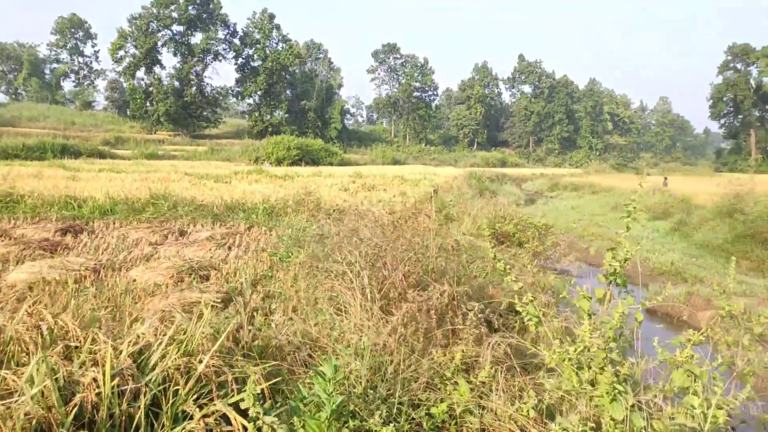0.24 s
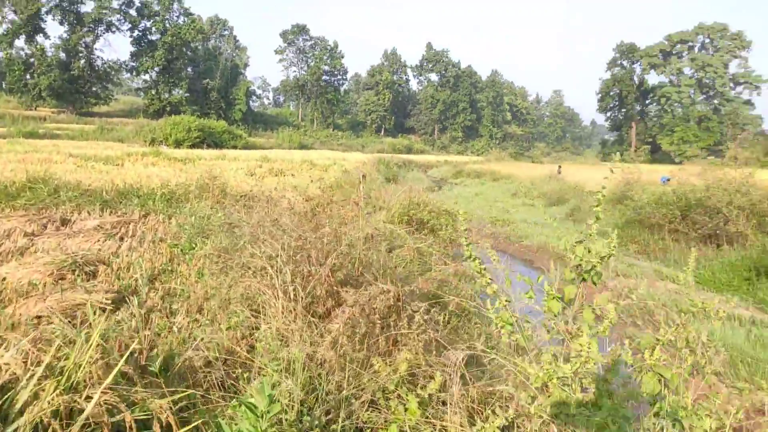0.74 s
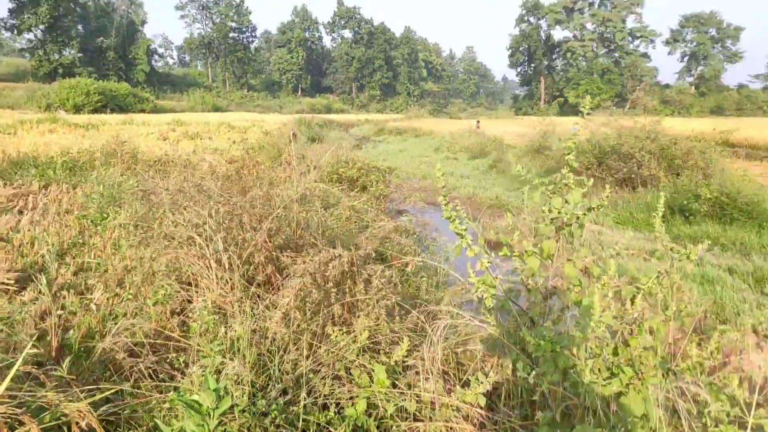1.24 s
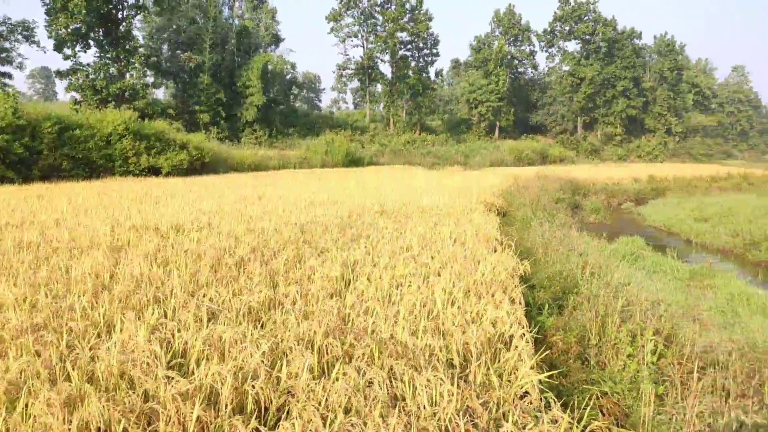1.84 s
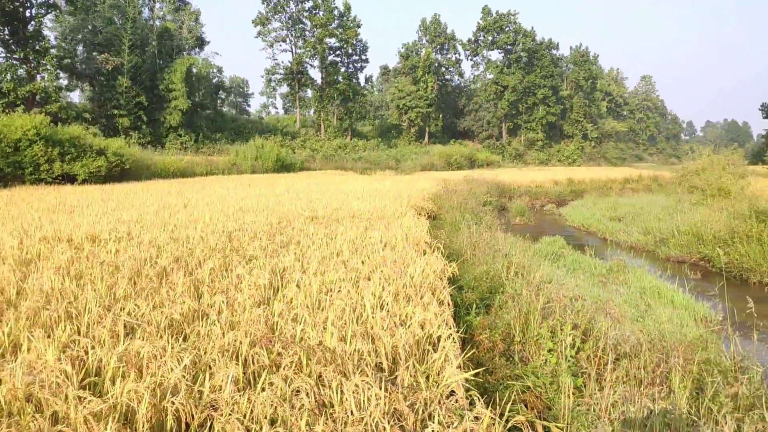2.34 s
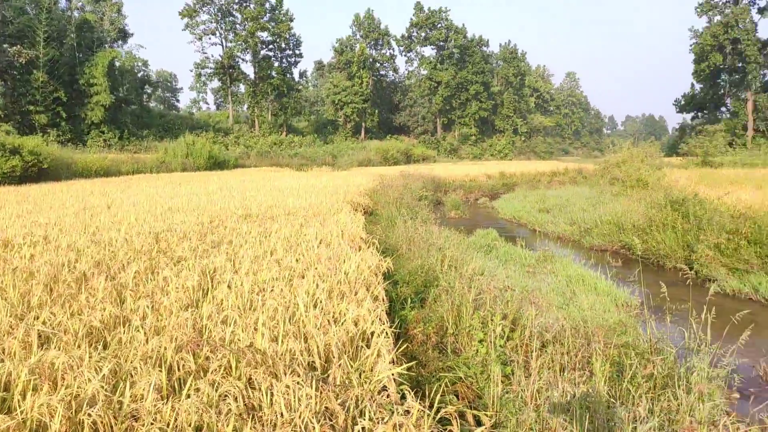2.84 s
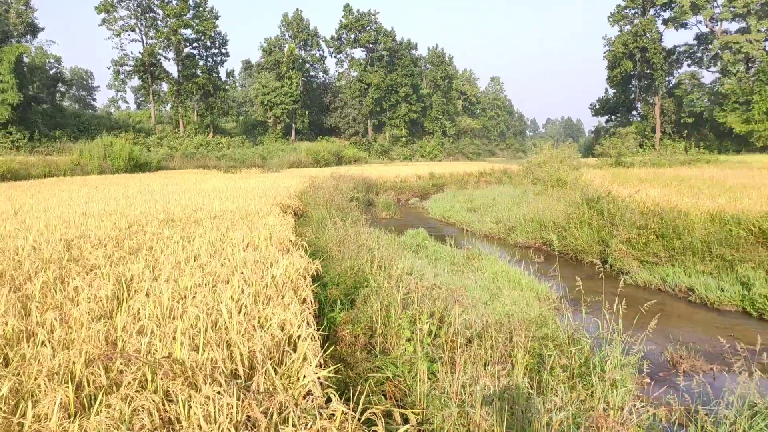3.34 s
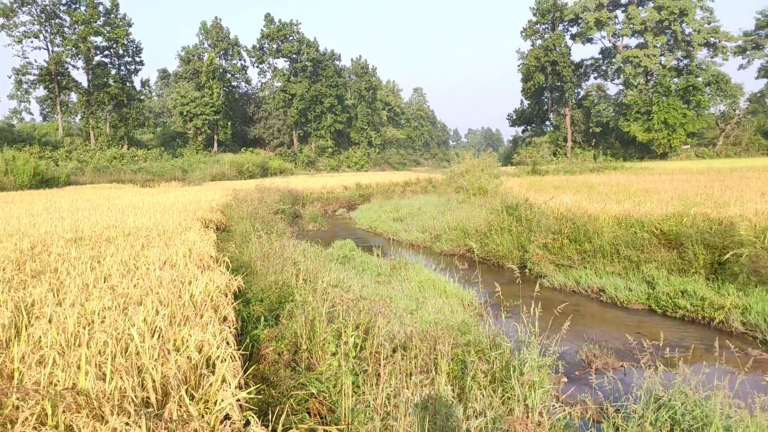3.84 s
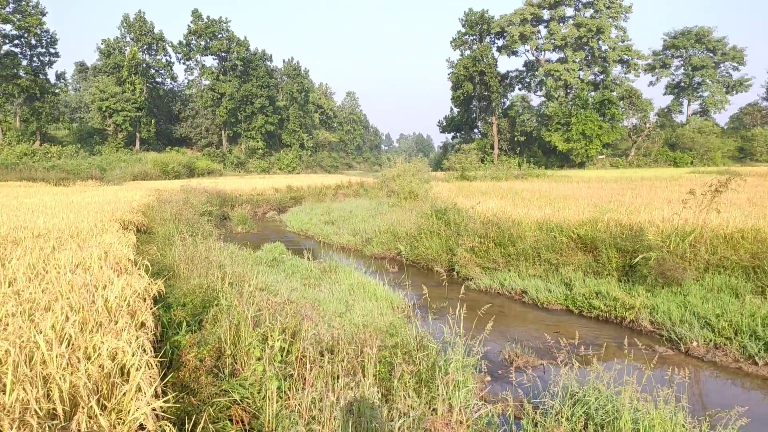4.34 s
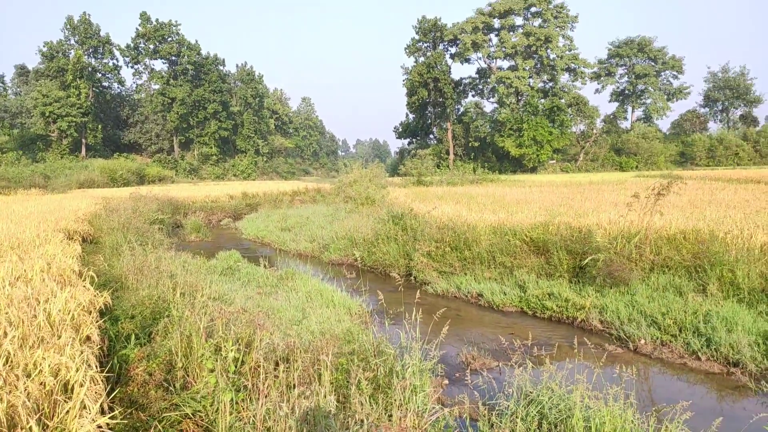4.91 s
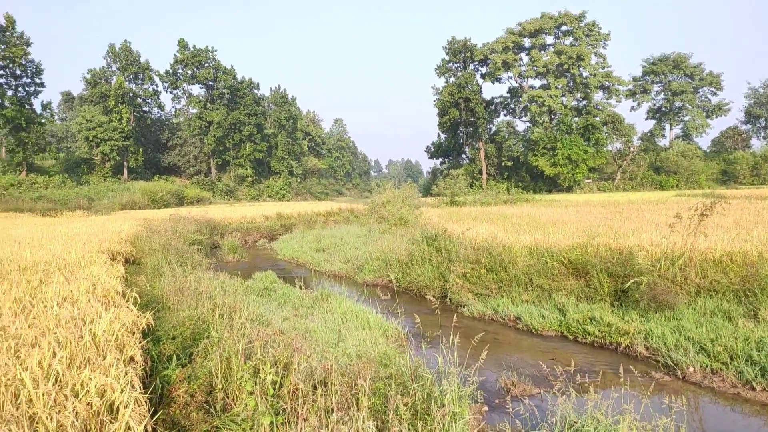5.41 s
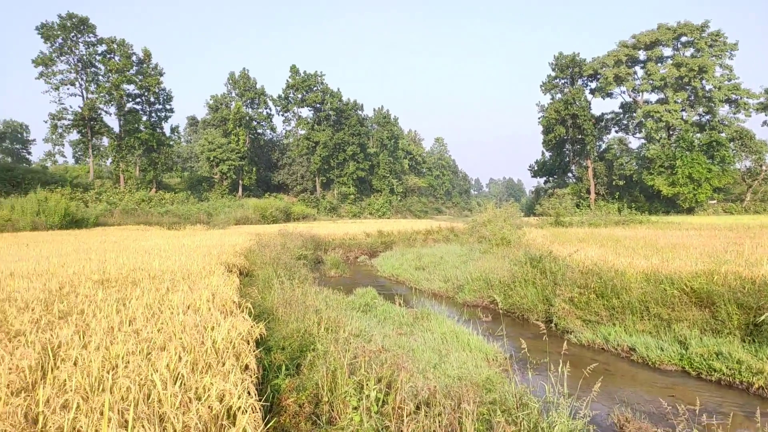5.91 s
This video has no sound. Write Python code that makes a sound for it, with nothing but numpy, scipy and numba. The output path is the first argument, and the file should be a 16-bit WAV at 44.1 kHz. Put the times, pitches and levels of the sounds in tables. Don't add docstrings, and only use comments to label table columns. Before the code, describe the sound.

From 0 to 1.4 s, dry stalks rustle close to a hand-held phone in crisp, uneven swells, strongest before 0.6 s, with a cluster of sharp snaps around 0.45-0.53 s. Dull finger knocks hit the left side at 0.27 and 0.75-0.9 s, then crowd together from 1.1 s to a heavy thump near 1.32 s. Crickets and a high insect chorus lie beneath. The sound cuts at 1.4 s to a tiny near-silent gap, and a calmer field fades in from 1.5 s. Rapid warbler trills around 4 kHz recur to the end, with three soft coos at 1.8, 2.2 and 2.7 s, breaking upward whistles, and a harsh rattle at 3.2 s. Dry ticks cluster near 3.45 s, with sparse ones later. A bright whistle leaps upward near 5.85 s. Steady insects, light wind, a faint far engine and scattered outdoor echoes continue to about 6.2 s.

```python
import sys
import numpy as np
from scipy import signal
from scipy.fft import rfft, irfft
from scipy.io import wavfile
from scipy.ndimage import uniform_filter1d
from numba import njit

SR = 44100
rng = np.random.default_rng(int(sys.argv[2]) if len(sys.argv) > 2 else 0)


def volts_from_decibels(level):
    exponent = np.asarray(level, float) / 20
    return 10 ** exponent


def unload_audio(sound):
    columns = np.transpose(np.atleast_2d(sound))
    steps = np.round(np.clip(columns, -1, 1) * 32767)
    wavfile.write(sys.argv[1], SR, steps.astype(np.int16))


N = 272097

NOTE_STEP_S, NOTE_S, SHORT_NOTE_S = .051, .034, .022


def curve(table):
    s, *columns = np.transpose(table)
    return [np.interp(np.arange(N) / SR, s, c) for c in columns]


def unit(x):
    return x / np.sqrt(np.mean(x ** 2))


def pan(db):
    return volts_from_decibels(np.array([db / 2, -db / 2])).reshape(2, -1)


@njit
def svf(x, hz, width):
    y, b, l = np.empty(len(x)), 0., 0.
    for i in range(len(x)):
        g, k = np.tan(np.pi * hz[i] / SR), width / hz[i]
        v = (b + g * (x[i] - l)) / (1 + g * (g + k))
        b, l, y[i] = 2 * v - b, l + 2 * g * v, k * v
    return y


def band(x, hz, width):
    hz = np.clip(hz * np.ones(len(x)), 10, .45 * SR)
    return svf(svf(x, hz, 1. * width), hz, 1. * width)


def band_noise(hz, width):
    return unit(band(rng.standard_normal(N), hz, width))


def walk(rate):
    k = int(SR / rate)
    steps = np.repeat(rng.standard_normal(N // 50), k)[:N]
    return unit(uniform_filter1d(uniform_filter1d(steps, k), k))


def coloured(x, shape):
    hz, db = np.transpose(shape)
    f = np.maximum(np.arange(N // 2 + 1) * SR / N, 1)
    return irfft(rfft(x) * volts_from_decibels(np.interp(np.log(f), np.log(hz), db)), N)


def add(out, s, x):
    i = int(s * SR)
    out[:, i:i + x.shape[1]] += x[:, :N - i]


def brushing():
    # (loudest time [s], level [dB], swell [s], die-away [s])
    brushes = [(0.005, -50.5, .1, 0.036), (.09, -45.5, 0.07, 0.42), (.14, -51, .03, 0.045),
               (.21, -44, 0.065, 0.02), (.42, -53, 0.43, 0.16), (.65, -52, 0.12, 0.096),
               (0.521, -43.5, 0.063, 0.041), (.99, -59.5, 0.091, 0.44), (1.07, -60, .1, 0.045),
               (1.145, -51, 0.018, 0.37), (1.22, -55, 0.054, 0.27)]
    t, power = np.arange(N) / SR, 0
    for s, db, swell, fade in brushes:
        shape = np.exp(np.where(t < s, (t - s) / swell, (s - t) / fade))
        power = power + (volts_from_decibels(db) * shape) ** 2
    return 10 * np.log10(power + 1e-12)


def stalk_cracks(density=.2, spread=1.8):
    sizes = volts_from_decibels(spread * rng.exponential(size=(2, N)))
    return rng.standard_normal((2, N)) * (.5 + (rng.random((2, N)) < density) * sizes)


def rustle(patchy_db=.7):
    # (frequency [Hz], level [dB])
    thin_stalks = [(1760, -55), (3000, -11), (4930, -7.5), (5670, -11.5), (6620, -10), (10200, -0.5),
                   (13400, -5), (16000, -7.5)]
    top_db = brushing()
    top = unit(coloured(stalk_cracks(), thin_stalks)) * volts_from_decibels(top_db + 6.0 + patchy_db * walk(39.9))
    thinnest = coloured(top, [(9000, -30), (13000, 0), (16000, 0)])
    brighter_per_db = 0.34
    top = top + (volts_from_decibels(brighter_per_db * np.minimum(top_db + 51, 5)) - 1) * thinnest
    stems = coloured(stalk_cracks(), [(200, -8.0), (700, -6.0), (1500, -3.5), (3000, -0.5), (6000, -3.5)])
    stems = unit(stems + 0.42 * stems[::-1])
    stems_db, follow = -58.5, 0.54
    stems_db = stems_db + follow * (top_db + 52.0) + 6.0 + patchy_db * walk(33)
    return top * pan(5.5) + stems * volts_from_decibels(stems_db)


def knocks():
    # (time [s], peak level [dB], ring [Hz], ring fall by 60 dB [s], tick level [dB])
    pushes = [(0.273, -33, 200, 0.0096, -58), (0.751, -38.5, 302.7, 0.0071, -42),
              (0.845, -38.5, 191, 0.013, -33), (.917, -44, 490, 0.0054, -35.5),
              (1.117, -25, 150, 0.0075, -42), (1.186, -32.5, 150, 0.015, -39),
              (1.213, -27.5, 306, 0.0048, -46), (1.242, -27, 133, 0.019, -36),
              (1.262, -28, 130, 0.018, -39), (1.317, -44, 403, 0.0053, -24),
              (1.3187, -17, 78, 0.028, -18.5), (1.354, -20, 170, 0.0044, -25.5),
              (1.3564, -36.5, 122, 0.044, -31)]
    out, t = np.zeros((2, N)), np.arange(SR // 10) / SR
    far_port = np.array([[1], [volts_from_decibels(-23.5)]])
    for s, db, hz, t60, tick_db in pushes:
        ring = np.sin(2 * np.pi * hz * t) * 1000 ** (-t / t60)
        swing = -volts_from_decibels(db + 1.0) * ring * (1 - np.exp(-t / 0.00087))
        tick_s = .00013 + .001 * volts_from_decibels(db)
        tick = volts_from_decibels(tick_db) * np.exp(-((t - .0006) / tick_s) ** 2)
        add(out, s - .001, (np.roll(swing, 30) + tick) * far_port)
    return out


def trill(phrases, length_s, fall=1):
    slowing, sag_hz_per_note, soft_start_db, warm_up_notes = .04, 24.7, -12, 0.55
    notes = []
    for first, last, db, hz, pan_db in phrases:
        k = np.arange(round((last - first) / NOTE_STEP_S) + 1)
        u = k / k[-1]
        s = first + (last - first) * (u - slowing * u * (1 - u))
        note_db = db + soft_start_db * np.exp(-k / warm_up_notes)
        same = 0 * k
        notes += zip(s, note_db, hz - sag_hz_per_note * k, pan_db + same, length_s + same, fall + same)
    return notes


def far_warblers(db=-68, count=150):
    when, loud, pitch, side = rng.random((count, 4)).T
    return np.transpose([1.7 + 4.4 * when, db + 4 * loud, 4000 + 450 * pitch, 12 * side - 6,
                         NOTE_S + 0 * when, 1 + 0 * when])


def warbler(fall_hz=26000, bend=200000.0):
    # (first note [s], last note [s], level [dB], first pitch [Hz], left minus right [dB])
    full_phrases = [(1.697, 1.944, -47, 4480, -1), (2.17, 2.277, -58, 4250, -4),
                    (2.345, 2.497, -52, 4350, -5), (2.476, 2.683, -44.5, 4230, -1),
                    (2.763, 2.966, -47.5, 4335, -1), (2.97, 3.072, -59, 4020, -4),
                    (2.985, 3.035, -54, 4430, -3), (3.203, 3.451, -48.5, 4455, -11),
                    (3.924, 4.176, -48.5, 4195, -5.5), (4.252, 4.408, -52.5, 4370, -1),
                    (4.407, 4.661, -50.5, 4394, -16), (4.84, 4.997, -58.5, 4430, 2),
                    (4.985, 5.088, -57, 4300, 1), (5.229, 5.435, -47, 4210, 0.5),
                    (5.438, 5.595, -53, 4050, -2), (5.715, 5.766, -55, 4150, -4),
                    (5.86, 5.962, -53.5, 4210, 2), (5.895, 5.987, -52.5, 4140, -2),
                    (5.948, 6.134, -46, 4410, -1), (6.045, 6.139, -44, 4125, -5)]
    high_phrases = [
        (2.755, 2.953, -49, 4600, -2),
        (5.217, 5.417, -50.5, 4610, 2),
    ]
    short_phrases = [(1.95, 2.16, -49.5, 4080, -3.5), (1.97, 2.128, -57, 4030, -6),
                     (2.787, 2.989, -53, 4360, -1), (3.565, 3.77, -56.5, 4290, -1),
                     (3.645, 3.85, -55.5, 4210, 4), (5.1, 5.2, -59, 4500, 2), (5.65, 5.75, -63, 4400, 0)]
    # (start [s], delay of the left port [ms])
    phrase_lag = [(1.7, 0.02), (1.98, 0.27), (2.37, 0.2), (2.46, 0.48), (2.78, 0.61), (3.24, 0.0),
                  (3.6, 0.5), (3.95, -0.23), (4.28, 0.05), (4.45, 0.29), (4.84, 0.25), (5.25, 0.39),
                  (5.47, 0.5), (5.9, 0.52)]
    starts, lags = np.transpose(phrase_lag)
    out = np.zeros((2, N))
    flutter = volts_from_decibels(1.6 * walk(160))
    notes = [*trill(full_phrases, NOTE_S), *trill(high_phrases, SHORT_NOTE_S, fall=0.55),
             *trill(short_phrases, SHORT_NOTE_S), *far_warblers()]
    for s, db, hz, pan_db, length_s, fall in notes:
        lag = lags[max(np.searchsorted(starts, s) - 1, 0)] / 1000
        t = np.arange(-.025, .025, 1 / SR) - np.array([[lag], [0]])
        shape = np.cos(np.pi * np.clip(t / length_s, -.5, .5)) ** 1.08 * volts_from_decibels(60 * t)
        tone = np.sin(2 * np.pi * (hz * t - fall * fall_hz * t ** 2 / 2 - bend * t ** 3 / 3))
        add(out, s - .025, volts_from_decibels(db - 2.0 - abs(pan_db) / 4) * shape * tone * pan(pan_db))
    bank = volts_from_decibels(-13) * np.roll(out[::-1], int(.023 * SR), axis=1)
    return (out + bank) * flutter


def whistles(calls, edge_s, lag, flutter_db, smooth_s):
    out, flutter = np.zeros((2, N)), volts_from_decibels(flutter_db * walk(120))
    waver = 1 + .006 * flutter_db / 2 * walk(250)
    for call in calls:
        s, *columns = np.transpose(call)
        t = np.arange(s[0], s[-1], 1 / SR)
        here = slice(int(s[0] * SR), int(s[0] * SR) + len(t))
        hz, db, octave_db, pan_db = (np.interp(t, s, c) for c in columns)
        edge = np.clip(np.minimum(t - s[0], s[-1] - t) / edge_s, 0, 1)
        hz = uniform_filter1d(hz, int(smooth_s * SR), mode="nearest") * waver[here]
        phase = np.cumsum(hz) * 2 * np.pi / SR + np.array([[0], [lag]])
        voice = volts_from_decibels(db + 9) * np.sin(phase) + volts_from_decibels(octave_db + 9.0) * np.sin(2 * phase)
        add(out, s[0], edge * flutter[here] * pan(pan_db) * voice)
    return out


def glides(table, pan_db):
    bend, swell_db = 1.4, -9.5
    return [[(s + u * length, hz + (to_hz - hz) * u ** bend, db + swell_db * max(1 - 2 * u, 0), -99, pan_db)
             for u in np.linspace(0, 1, num=7)] for s, length, hz, to_hz, db in table]


def two_part_whistles():
    # (time from the break [s], pitch [Hz], level [dB])
    low_part = [(-.062, 1690, -17), (-.047, 1900, -8), (-.03, 2050, -4), (-.01, 2185, 0), (0, 2330, 0)]
    high_part = [(0, 2750, 5), (.006, 3050, 8), (.024, 3600, 9), (.03, 4450, 1), (.04, 4720, 3),
                 (.072, 4830, 1)]
    # (break [s], pitch ratio, level [dB], share of the high part sung, left minus right [dB])
    whistle_rows = [
        (2.309, 1.065, -63, .99, 9),
        (3.301, 1.025, -64.5, 0.99, 11),
        (4.427, 0.97, -67, 0.47, 9.5),
        (5.162, .96, -65, 0.46, 6),
        (6.104, 0.95, -66, 0.79, 9.5),
    ]
    calls = []
    for at, ratio, db, share, pan_db in whistle_rows:
        pure = ratio > 1
        octave_db = -5 if pure else 4
        low = []
        for s, hz, up in low_part:
            low_db = db + up - 1.5 * (not pure)
            if pure and s == low_part[0][0]:
                low_db -= 25
            low.append((at + s, ratio * hz, low_db, db + octave_db + up / 3, pan_db))
        calls.append(low)
        s, hz, up = np.transpose(high_part)
        end = share * s[-1]
        haste = 1 if pure else .75
        calls.append([(at + haste * u, ratio * np.interp(u, s, hz), db + np.interp(u, s, up), -99, pan_db)
                      for u in np.append(s[s < end], end)])
    return calls


def songs():
    # (time [s], pitch [Hz], level [dB], octave level [dB], left minus right [dB])
    long_whistle = [(5.762, 1578, -77, -65, 2), (5.79, 2140, -82.5, -61.5, -15), (5.822, 2600, -60, -58, 3),
                    (5.8415, 2790, -61, -83, -2), (5.843, 3370, -54, -95, 4), (5.85, 3360, -44, -95, 2),
                    (5.854, 3410, -61, -93, 6), (5.859, 3510, -46, -95, 1), (5.878, 4080, -74, -97, -3)]
    # (time [s], length [s], from [Hz], to [Hz], level [dB])
    glides_left = [(2.247, 0.012, 1900, 3600, -70), (2.258, 0.0195, 3450, 4300, -70),
                   (3.245, 0.038, 3200, 4560, -69), (4.066, 0.015, 1946, 3220, -69),
                   (4.078, 0.054, 3140, 2454, -59), (4.11, .042, 3000, 2690, -65.5),
                   (4.128, 0.046, 2100, 1850, -76.5), (4.15, 0.018, 3970, 3020, -63)]
    glides_ahead = [(3.772, 0.054, 1700, 2850, -78.5), (4.42, 0.064, 3600, 4650, -59.5),
                    (5.036, 0.033, 2640, 2290, -68), (5.15, 0.09, 4150, 4610, -65),
                    (5.352, 0.032, 2680, 2960, -65.5), (5.385, 0.027, 2900, 3000, -72),
                    (5.33, .02, 4150, 4530, -65), (5.395, .03, 3500, 3820, -67),
                    (5.373, 0.0263, 3600, 4120, -57), (5.81, .03, 3050, 3250, -70),
                    (6.13, 0.033, 4400, 4570, -66)]
    calls = [long_whistle, *glides(glides_left, 12), *glides(glides_ahead, 3), *two_part_whistles()]
    return whistles(calls, 0.0009, lag=2.08, flutter_db=2, smooth_s=0.0016)


def rattles():
    # (time [s], length [s], level [dB], pulse rate [1/s], die-away [s])
    parts = [
        (3.213, 0.035, -46, 410, 0.015),
        (3.251, 0.0676, -57, 300, 0.12),
    ]
    # (from [Hz], to [Hz], width [Hz], level [dB])
    throats = [
        [(1900, 1200, 450, -1), (2650, 2340, 840, 0), (3700, 3350, 560, 1), (1060, 970, 380, -7)],
        [(1410, 1800, 370, -5), (2000, 2350, 520, 0), (3600, 4600, 900, -14)],
    ]
    jitter, breath = .15, 0.45
    out, t = np.zeros((2, N)), np.arange(SR // 10) / SR
    for (s, length, db, rate, fade), throat in zip(parts, throats):
        chance = rng.standard_normal((len(t), 4)).T
        phase = np.cumsum(rate * (1 + jitter * unit(uniform_filter1d(chance[0], size=130)))) / SR
        starts = np.diff(phase % 1, prepend=0) < 0
        pulses = unit(starts * volts_from_decibels(1.2 * chance[1])) + breath * chance[2:]
        shape = np.clip(np.minimum(t / 0.0074, (length - t) / 0.0055), 0, 1) * np.exp(-t / fade)
        voice = 0
        for hz, to_hz, width, up_db in throat:
            glide = hz + (to_hz - hz) * np.minimum(t / length, 1)
            voice = voice + volts_from_decibels(up_db) * np.array([unit(band(row, glide, width)) for row in pulses])
        add(out, s, volts_from_decibels(db) * shape * voice * pan(8.5))
    return out


def coos():
    # (time [s], pitch [Hz], level [dB])
    coo = [
        (0, 449, -17),
        (0.019, 560, -9),
        (0.055, 441, -4),
        (0.098, 449, -5),
        (.135, 485, -7),
        (0.153, 477, -22),
    ]
    # (start [s], pitch ratio, level [dB], left minus right [dB])
    each_coo = [
        (1.756, 0.99, -53.5, -3),
        (2.233, 0.97, -54.5, -4),
        (2.669, .93, -55.5, -2.5),
    ]
    calls = []
    for at, ratio, db, pan_db in each_coo:
        calls.append([(at + s, ratio * hz, db + up, -99, pan_db) for s, hz, up in coo])
    return whistles(calls, 0.006, lag=0.93, flutter_db=0.6, smooth_s=.014)


def echoes(x):
    t = np.arange(SR // 2) / SR
    tail = 0
    for db, t60 in (-10, 0.13), (-12, .75):
        part = rng.standard_normal((2, len(t))) * 1000 ** (-t / t60) * np.clip(t / 0.0021, 0, 1)
        tail = tail + part * volts_from_decibels(db) / np.sqrt(np.sum(part ** 2) / 2)
    return signal.fftconvolve(x, tail, axes=1)[:, :N]


def snaps():
    # (time [s], level [dB], centre [Hz], width [Hz], left minus right [dB])
    ticks = [(.443, -34, 11500, 5000, 5), (.468, -43.5, 3000, 3000, 5), (.481, -32, 13000, 4000, 2),
             (.495, -29, 8500, 4000, -3), (.512, -31, 12500, 4000, 5), (.519, -31, 12100, 6000, 5),
             (.527, -33.5, 3700, 4000, -1.5), (.528, -32, 12600, 4000, 5), (.621, -43, 12000, 4920, 3),
             (.66, -54, 1000, 900, 4), (0.776, -50, 2400, 1500, 6), (0.827, -44.5, 2620, 1800, 6),
             (.895, -56, 900, 900, 9), (0.928, -41, 955, 800, 5), (1.074, -48, 9900, 8040, 24),
             (1.156, -50, 1700, 1490, 12), (3.398, -47, 4000, 4000, 6), (3.421, -48, 10040, 5000, 10),
             (3.448, -46.5, 2920, 4000, 14), (3.449, -50, 9000, 7000, 12), (3.458, -48, 3200, 1500, 6),
             (3.486, -43.5, 3560, 5000, 0), (4.61, -54.5, 2110, 1490, 10), (4.634, -54, 2800, 2000, 5),
             (5.132, -50, 12200, 5900, 9), (5.362, -45.5, 10700, 3020, 10), (5.495, -53, 11500, 5030, 12)]
    # (time [s], level [dB], centre [Hz], width
    # [Hz], decay [s])
    crunches = [(0.518, -46, 10230, 9000, 0.0078), (.931, -60.5, 390, 147.7, 0.062),
                (3.447, -50, 1290, 497, 0.0063), (3.491, -55, 3740, 704, 0.059),
                (4.147, -54.5, 2730, 610, 0.015), (5.362, -50, 4560, 600, 0.0057),
                (1.58, -72, 400, 100, .06), (3.22, -67, 398, 150, 0.028), (4.97, -71, 480, 100, .06),
                (5.58, -70, 390, 80, .07), (5.98, -71, 390, 80, 0.064)]
    out, t = np.zeros((2, N)), np.arange(SR // 5) / SR
    tick_decay_s, crunch_pan_db = 0.0015, 4
    rows = [(*row[:-1], tick_decay_s, row[-1]) for row in ticks]
    rows += [(*row, crunch_pan_db) for row in crunches]
    for s, db, hz, width, decay, pan_db in rows:
        burst = np.array([unit(band(row, hz, width)) for row in rng.standard_normal((2, len(t)))])
        add(out, s, volts_from_decibels(db) * burst * np.exp(-t / decay) * pan(pan_db))
    return out


def strokes(rate, duty, wobble):
    phase = np.cumsum(rate * (1 + wobble * walk(6.6))) / SR + rng.random()
    return np.exp(-((phase % 1 - .5) / duty) ** 2)


def near_crickets(rough=.5):
    # (wing tone [Hz], stroke rate [1/s], level [dB], left minus right [dB])
    singers = [(5820, 110, 3.5, -14.5), (5530, 62, 6, -5.5), (5670, 110, 1.5, 6), (5735, 64, 6, 0),
               (5860, 105, 0.5, 5), (6360, 62, -3.5, 4), (6600, 61, -6.5, 3.5)]
    out = 0
    for hz, rate, db, side_db in singers:
        wing = np.cumsum(hz * (1 + .01 * walk(90))) * 2 * np.pi / SR
        gate = strokes(rate, 0.2, .015) * volts_from_decibels(db + 2.0 * walk(5))
        ports = np.array([np.sin(wing + turn) + rough * band_noise(hz, 680.0)
                          for turn in 2 * np.pi * rng.random(2)])
        out = out + gate * ports * pan(side_db)
    return out


def bush_crickets():
    # (centre [Hz], width [Hz], stroke rate [1/s], level [dB])
    chorus = [(7840, 1330, 95, 1), (8500, 1060, 150, 0), (9000, 1100, 150, -4.5), (7450, 450, 120, -8.5),
              (10300, 1500, 130, -18.5)]
    out = 0
    for hz, width, rate, db in chorus:
        gate = volts_from_decibels(db + 1.1 * walk(8.7)) * (4.8 + strokes(rate, 0.35, 0.033))
        out = out + gate * np.array([band_noise(hz, width) for _ in range(2)])
    return out


def insects(far_db=-1.0):
    # (time [s], cricket level [dB], chorus level [dB],
    #  cricket left minus right [dB], chorus left minus right [dB])
    insect_levels = [(0, -56.5, -54.5, -1, 0), (.5, -58.5, -57, 2.5, 2.5), (.8, -59, -59, 3.5, 2),
                     (1.1, -59, -64.5, 4, -1), (1.4, -57, -73, 5.5, -14), (1.5, -61, -60, 7.5, 6.5),
                     (2.5, -61, -59, 6.5, 5), (3.5, -60.5, -58.5, 9.5, 4.5), (4.5, -61, -59, 11, 3.5),
                     (5.3, -60, -59, 9.5, 3), (6.2, -61, -58.5, 10, 4.5)]
    cricket_db, chorus_db, cricket_pan_db, chorus_pan_db = curve(insect_levels)
    far = np.array([band_noise(5807, 1050.0) for _ in range(2)])
    crickets = unit(unit(near_crickets()) + volts_from_decibels(far_db) * far)
    crickets = crickets * volts_from_decibels(cricket_db + 3.5) * pan(cricket_pan_db)
    return crickets + unit(bush_crickets()) * volts_from_decibels(chorus_db + 3.5) * pan(chorus_pan_db)


def air():
    # (frequency [Hz], level [dB])
    wind = [(12, -34), (20, 4), (70, 0.5), (188, -26.5), (320, -23.5), (394, -22), (625, -26), (864, -34),
            (1340, -33), (1470, -34.5), (3790, -25.5), (4250, -23.5), (5000, -48), (6500, -56),
            (11000, -120)]
    # (time [s], level [dB], half length [s])
    gusts = [(.85, 2, .1), (4.06, 2.5, .1), (1.898, 2, .08), (2.2, 2.5, .1), (3.9, 1.5, 0.055),
             (4.304, 2.5, .1), (5.068, 3, 0.047)]
    # (time [s], centre [Hz], level [dB])
    engine = [(1.5, 688, -82.5), (2.7, 743, -88), (2.85, 800, -79), (3.2, 694, -79), (3.6, 682, -86.5),
              (4.3, 643, -82.5), (5.0, 666, -80), (6.2, 602, -81.5)]
    out, (hz_at, db_at) = 0, np.transpose(wind)
    gust_db = sum(db * np.exp(-((np.arange(N) / SR - s) / half) ** 2) for s, db, half in gusts)
    for hz in 22 * 2 ** np.arange(0, 7.9, .4):
        mid, side = (band(rng.standard_normal(N), hz, hz / 2.14) for _ in range(2))
        db = np.interp(np.log(hz), np.log(hz_at), db_at) + 1.85 * walk(9.4) + gust_db * (hz < 130)
        out = out + volts_from_decibels(db) * (mid + min(0.22 + hz / 1200, 1) * side * np.array([[1], [-1]]))
    hz, db = curve(engine)
    drone = band_noise(hz, 140.) * volts_from_decibels(db)
    hiss_shape = [(3000, -29.5), (5000, -2.0), (9500, 5.5), (11000, -1.0), (15000, -3.0)]
    hiss = unit(coloured(rng.standard_normal((2, N)), hiss_shape)) * volts_from_decibels(-71 + 8.0)
    buffets = volts_from_decibels(-62) * np.array([walk(22), 1.38 * walk(18)])
    return unit(out) * volts_from_decibels(-59.5 + 1.5) + buffets + drone + hiss


def scene():
    first_take = np.arange(N) / SR < 1.45
    birds, dove = warbler() + songs() + rattles(), coos()
    echo = echoes(birds + volts_from_decibels(1) * dove)
    return rustle() * first_take + knocks() + birds + dove + echo + snaps() + insects() + air()


def edit():
    cut_s, cut_fall_s, fade_in_s, fade_rise_s = 1.3995, 0.00024, 1.492, 0.14
    first_take_db, second_take_db, gap_db = 2, 0.07, -87
    tail, tail_s = volts_from_decibels(-18), 0.0014
    t = np.arange(N) / SR
    after, cut = np.maximum(t - fade_in_s, 0), np.maximum(t - cut_s, 0)
    fade_out = (1 - tail) * np.exp(-cut / cut_fall_s) + tail * np.exp(-cut / tail_s)
    fade_in = 1 - np.exp(-after / fade_rise_s)
    gain = volts_from_decibels(first_take_db) * fade_out + volts_from_decibels(gap_db) + volts_from_decibels(second_take_db) * fade_in
    u = after / .5
    offset = .0094 * (1 - np.exp(-after / .032)) * np.exp(-after / .25) - .0102 * (u * np.exp(1 - u)) ** 2
    gap_offset = (cut > 0) * volts_from_decibels(-66) * np.exp(-cut / .13)
    return gain, offset * np.array([[0], [1]]) - gap_offset


def holes(x):
    # (frequency [Hz], share lost)
    calm_share = [(900, 0), (1300, .14), (2600, .15), (3450, .33), (4000, .02), (4900, .07), (5300, 0),
                  (9300, 0), (11000, .35), (15500, .55)]
    busy_share = [(2000, 0), (3200, .1), (4300, .13), (5200, .11), (5600, 0), (6000, 0), (6600, .07),
                  (7500, 0)]
    hz, s, z = signal.stft(x, SR, nperseg=1024)
    power = np.sum(abs(z) ** 2, axis=0)[:512].reshape(128, 4, -1).mean(axis=1)
    power = uniform_filter1d(power, size=4, axis=1)
    power /= signal.medfilt2d(power, (1, 21)) + 1e-30
    power = np.sqrt(np.clip(power, .4, 9))
    power *= volts_from_decibels(10 * uniform_filter1d(rng.standard_normal(power.shape), size=6, axis=1))
    kept = np.ones(power.shape, bool)
    for table, when in (busy_share, s < 1.35), (calm_share, s > 1.6):
        share = np.interp(hz[2:512:4], *np.transpose(table))
        kept[:, when] = [row >= np.quantile(row, q) for row, q in zip(power[:, when], share)]
    z[:, :512] *= np.repeat(kept, 4, axis=0)
    return signal.istft(z, SR, nperseg=1024)[1][:, :N]


def band_limit(x):
    return signal.sosfilt(signal.butter(12, 16710, fs=SR, output="sos"), x)


def record(dry):
    top_cut = signal.ellip(10, .2, 80, 15600, fs=SR, output="sos")
    phone = holes(signal.sosfilt(top_cut, dry))
    gain, offset = edit()
    return band_limit(phone * gain + offset)


dry = scene()
out = record(dry)
unload_audio(out)
```